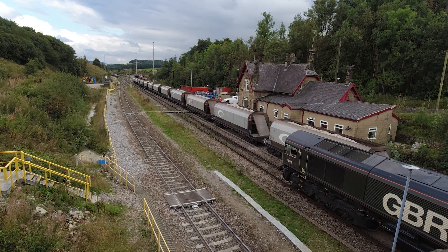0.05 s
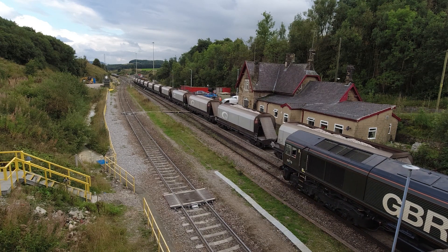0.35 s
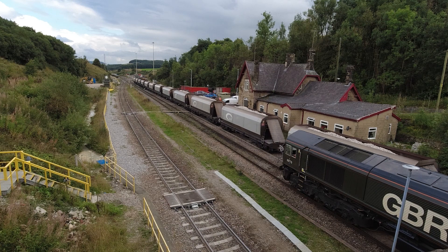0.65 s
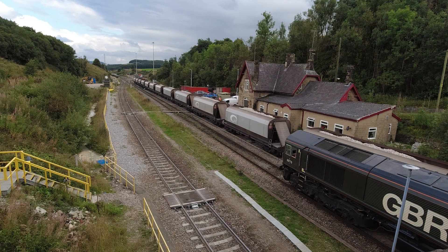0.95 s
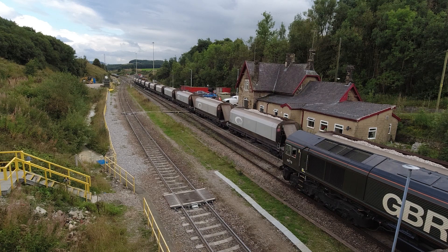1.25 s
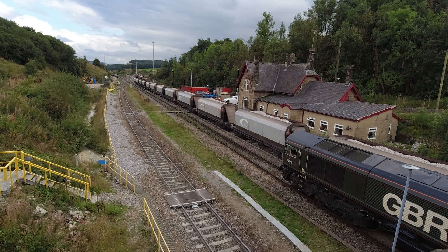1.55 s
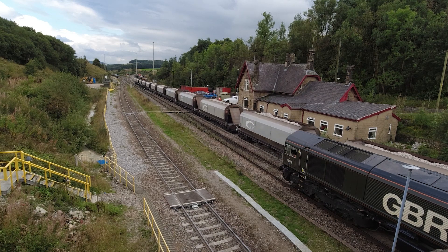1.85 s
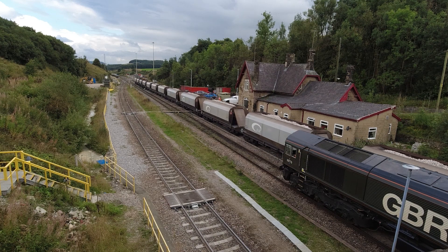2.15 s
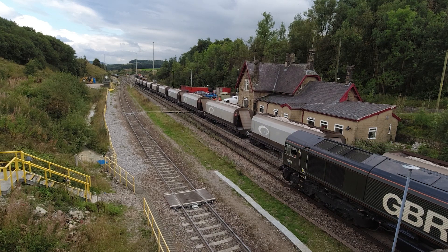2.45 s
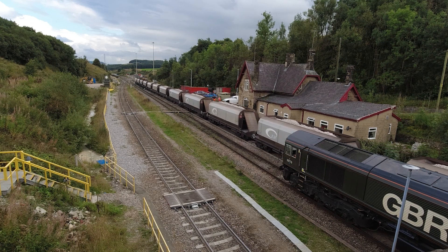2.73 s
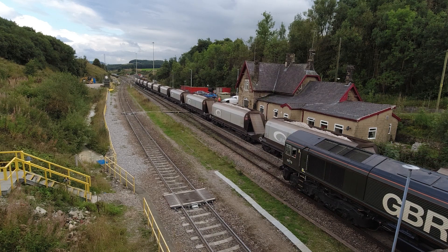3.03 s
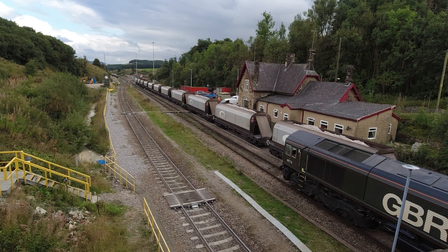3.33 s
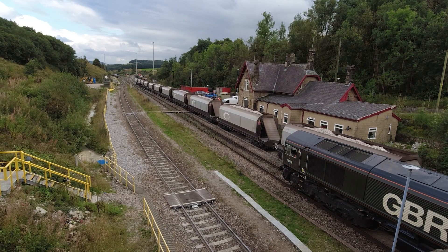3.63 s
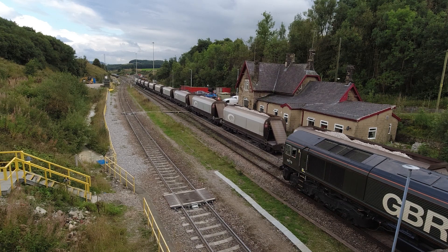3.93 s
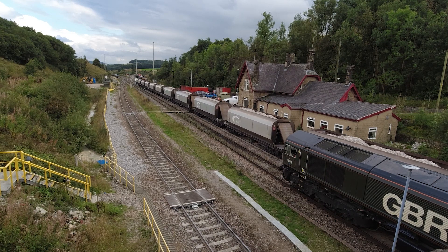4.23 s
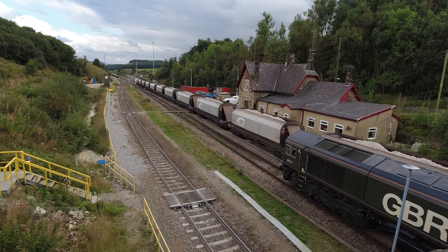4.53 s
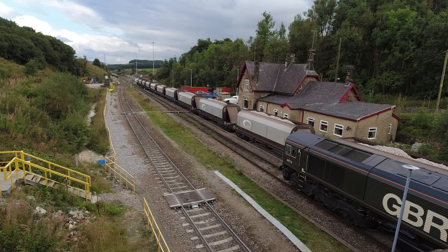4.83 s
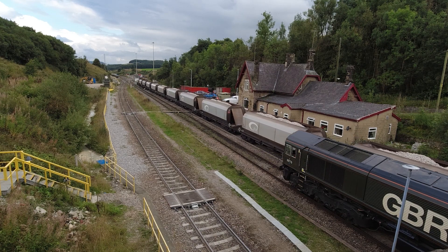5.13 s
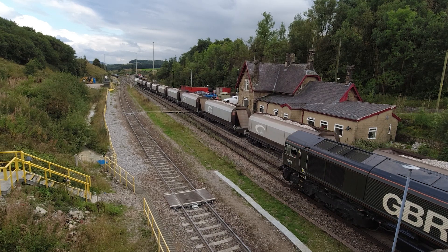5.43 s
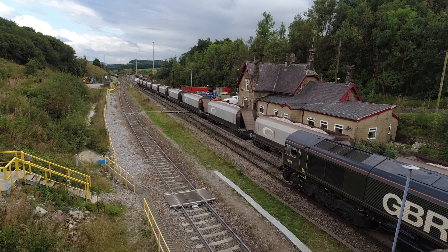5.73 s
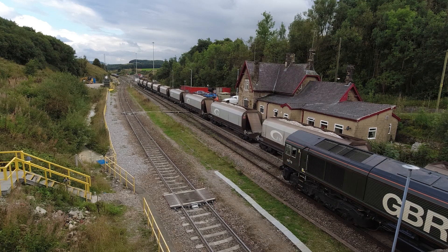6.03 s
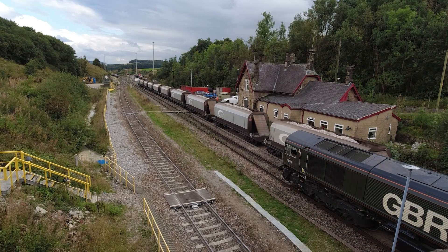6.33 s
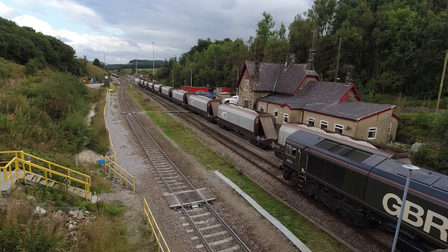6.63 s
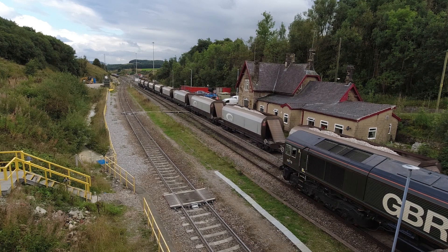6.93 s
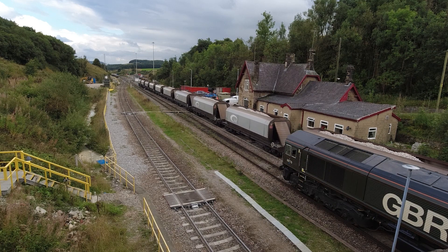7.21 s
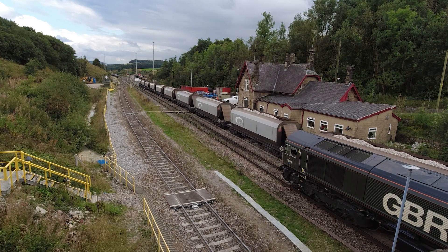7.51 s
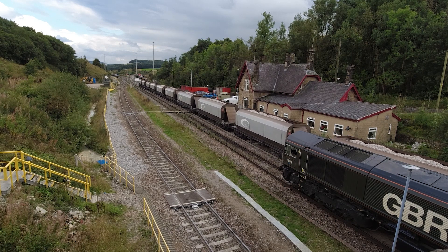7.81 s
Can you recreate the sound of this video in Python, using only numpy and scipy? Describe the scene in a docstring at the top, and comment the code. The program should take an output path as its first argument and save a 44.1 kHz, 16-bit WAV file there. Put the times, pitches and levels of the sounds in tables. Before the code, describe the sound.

Heard from a bridge over a rural railway, a diesel locomotive runs at a steady idle, droning and clattering under rushing fans, wavering high whines and a clinking pump. About a second in comes a short whistling hiss of brake air with a squeal. The exhaust booms softly a few times, a weaker puff of air escapes past the middle, and a brief low hum swells near the end.

```python
"""A twelve-cylinder two-stroke diesel locomotive idles at a country station, heard from a bridge above.
Crank orders hum; the exhaust beats and the machinery clatters once per revolution. Auxiliaries whine
over the fan roar and a pump clinks at its own rate. Brake air escapes in short hisses, whistling at the
valve edges; a squeal and a faint thin tone near 15 kHz sound during the first hiss.
Light knocks, two metal ticks, low rumbles and a brief hum come and go."""
import sys
import numpy as np
from scipy import signal
from scipy.fft import rfft, irfft, next_fast_len
from scipy.io import wavfile
from scipy.ndimage import uniform_filter1d

SR = 44100
rng = np.random.default_rng(int(sys.argv[2]) if len(sys.argv) > 2 else 0)


def dump_mix(stems):
    """Bounce the given channels to the path in sys.argv[1] as a 16-bit WAV at rate SR."""
    frames = np.atleast_2d(stems).T  # one column per channel
    limited = np.clip(frames, -1, 1)  # hard clip at full scale
    pcm = np.round(limited * 32767).astype(np.int16)
    wavfile.write(sys.argv[1], SR, pcm)


N = 347067
TIME = np.arange(N) / SR
CRANK_HZ = 5.72


def gain_of(db):
    """dB to amplitude."""
    return 10 ** (np.asarray(db) / 20)


def unit_rms(x):
    """Scale to rms 1."""
    return x / np.sqrt(np.mean(abs(x) ** 2) + 1e-30)


def log_interp(points, hz):
    """Interpolate (frequency, value) rows on a log-frequency axis."""
    f, value = np.transpose(points)
    return np.interp(np.log(hz + 1), np.log(f + 1), value)


def drift(hz, size=2048):
    """Complex random wander, rms about 1, low-passed at hz."""
    f = np.fft.fftfreq(size, N / SR / size)
    spectrum = np.exp(2j * np.pi * rng.random(size)) / np.sqrt(1 + (f / hz) ** 4)
    return np.interp(TIME, np.linspace(0, N / SR, size), unit_rms(np.fft.ifft(spectrum)))


def stereo_field(hz):
    """Left/right coherence and the left channel's phase factor."""
    # (frequency [Hz], coherence [0-1], left lag [rad])
    field = [(25, 0.3, .02), (93, 0.95, 0.064), (289, 0.99, 0.11), (493, 0.88, 0.19), (690, 1, 0.66),
             (955, 0.81, 0.17), (1830, 0.87, 1.1), (2370, 0, 0.72), (2940, 1, 2.06), (3570, 0.85, 2.32),
             (4410, 0.5, 2.87), (6600, 0.57, 3.7), (7650, 0.76, 6.1), (14000, 0.1, 8.2)]
    f, coherence, lag_rad = np.transpose(field)
    left_phase = np.exp(-1j * log_interp(np.c_[f, lag_rad], hz))
    return np.clip(log_interp(np.c_[f, coherence], hz), 0, 1), left_phase


def from_right(x):
    """Mono to stereo: sound from the right reaches the left later."""
    length = next_fast_len(N + 512, True)
    _, left_phase = stereo_field(np.fft.rfftfreq(length, 1 / SR))
    return np.array([irfft(rfft(x, length) * left_phase, length)[:N], x])


def noise(density, size=N):
    """Partly coherent stereo noise; density(hz) is amplitude per root Hz."""
    length = next_fast_len(size, True)
    hz = np.fft.rfftfreq(length, 1 / SR)
    a, b, c, d = rng.standard_normal((len(hz), 4)).T
    coherence, left_phase = stereo_field(hz)
    right = a + 1j * b
    left = (coherence * right + np.sqrt(1 - coherence ** 2) * (c + 1j * d)) * left_phase
    return irfft(np.array([left, right]) * density(hz), length)[:, :size] * np.sqrt(length * SR) / 2


def resonance(f, hz, width_hz):
    """Steep-sided peak of unit power."""
    half_hz = .8 * width_hz
    return np.sqrt(2 / (np.pi * half_hz)) / (1 + ((f - hz) / half_hz) ** 2)


def swell(t, rise_s, fall_db_s):
    """Gaussian rise to t = 0, then exponential decay."""
    return np.exp(-(np.minimum(t, 0) / rise_s) ** 2 / 2) * gain_of(-fall_db_s * np.maximum(t, 0))


def held(top_s, hold_s, rise_s, fall_db_s):
    """Swell that stays at its top for hold_s."""
    t = TIME - top_s
    return swell(t - np.clip(t, 0, hold_s), rise_s, fall_db_s)


def bursts(rows, size=65536):
    """One swell of resonant noise per row."""
    out = np.zeros((2, N))
    for peak_s, hz, width_hz, db, rise_s, fall_db_s in rows:
        start = max(round(peak_s * SR) - size // 4, 0)
        t = TIME[start:start + size] - peak_s
        band = noise(lambda f: resonance(f, hz, width_hz), size)[:, :len(t)]
        out[:, start:start + size] += gain_of(db) * swell(t, rise_s, fall_db_s) * band
    return out


def flutter(x, depth_db):
    """Random gain in 500 Hz by 30 ms patches, mid and side independent; depth_db is a function of Hz."""
    hz, _, z = signal.stft(np.array([x[0] + x[1], x[0] - x[1]]) / 2, SR, nperseg=256)
    patches = uniform_filter1d(rng.standard_normal(z.shape), size=3, axis=1)
    patches = uniform_filter1d(patches, size=10, axis=2)
    patches = unit_rms(patches - uniform_filter1d(patches, size=70, axis=2))
    mid, side = signal.istft(z * gain_of(depth_db(hz)[:, None] * patches), nperseg=256)[1][:, :N]
    return np.array([mid + side, mid - side])


def crank(wander=.00054):
    """Crankshaft angle in turns; the governor holds the speed almost constant."""
    hunting = drift(hz=2.1).real
    return np.cumsum(CRANK_HZ * (1 + wander * (hunting - hunting.mean()))) / SR


def revolution(turns, order_rms, size=16384):
    """Random-phase cycle of orders 1, 2, ..., repeated every turn."""
    spectrum = np.r_[0, order_rms * np.exp(2j * np.pi * rng.random(len(order_rms)))]
    cycle = irfft(spectrum, size) * size / np.sqrt(2)
    return np.interp(turns % 1, np.arange(size) / size, cycle, period=1)


def exhaust(turns, sixth_db=-46.5, ninth_db=-42, boom_rest_db=-41, sway_db=.2, limp_rad=.45):
    """Orders 6 and 9 drone; order 15 booms in swells and limps with the uneven firings."""
    # (top [s], hold [s], level [dB])
    booms = [(1.84, .07, -41), (2.43, .02, -34), (2.57, .03, -34.5), (2.7, .16, -38), (2.95, .04, -33.5),
             (3.13, .02, -39), (4.18, .08, -42.5), (4.68, .12, -44.5), (5.51, .12, -37.5),
             (5.94, .2, -36.7)]
    sixth, ninth = [gain_of(db - sway_db * unit_rms(drift(hz=.88).real)) for db in (sixth_db, ninth_db)]
    surges = sum(gain_of(db) * held(s, hold_s, rise_s=.021, fall_db_s=204) for s, hold_s, db in booms)
    tone = lambda order: np.sqrt(2) * np.exp(2j * np.pi * (order * turns + rng.random()))
    drone = sixth * tone(6) + ninth * tone(9)
    shudder = 1 + .078 * drift(hz=10)
    limp = np.exp(1j * limp_rad * np.sin(2 * np.pi * turns))
    boom = (gain_of(boom_rest_db) + surges) * shudder * limp * tone(15)
    return from_right((drone + boom).real)


def chuff(turns, order=39, peak_turn=.34, level_db=-45, uneven_db=1.2):
    """One heavy beat of varying force per turn rings the exhaust; the tails overlap."""
    since_s = ((turns - peak_turn + .25) % 1 - .25) / CRANK_HZ
    ring = np.sqrt(2) * np.exp(2j * np.pi * order * turns) * (1 + .35 * drift(hz=20))
    beats = sum(swell(since_s + k / CRANK_HZ, rise_s=.014, fall_db_s=230) for k in (-1, 0, 1, 2))
    force = gain_of(level_db + uneven_db * unit_rms(drift(CRANK_HZ).real))
    return from_right(force * beats * ring.real)


def machinery(turns, uneven_db=2, shimmer=.26):
    """Valve and injector clatter repeats every turn, pushed by the twelve firings."""
    # (crank order, level [dB])
    strong_orders = [(7, -57.5), (8, -60), (11, -56.5), (12, -58), (17, -58), (18, -57.5), (21, -62),
                     (24, -57), (27, -53.5), (32, -60.5), (36, -62), (47, -61.5), (48, -59), (63, -60),
                     (66, -58), (69, -62), (71, -62), (74, -58), (77, -60), (79, -57), (81, -51), (82, -58),
                     (83, -60), (84, -60.5), (87, -56), (92, -61), (96, -58), (99, -59.5), (101, -59),
                     (104, -58.5), (110, -61.5), (111, -60), (112, -58), (113, -54), (114, -59),
                     (116, -60.5), (117, -62), (120, -62), (123, -65), (126, -63), (134, -65.5), (135, -64),
                     (141, -64.5), (142, -65), (144, -64), (149, -66.5), (151, -65), (153, -67), (156, -64),
                     (158, -64.5), (160, -69), (173, -70), (176, -69.5), (226, -70.5), (227, -71.5),
                     (236, -68.5), (238, -68.5), (246, -70)]
    # other orders: (frequency [Hz], level per order [dB])
    clatter_spectrum = [(25, -58), (130, -70), (230, -60.5), (320, -78.5), (450, -61.5), (620, -61),
                        (740, -70), (880, -74), (1150, -82), (1400, -78), (1900, -81), (2400, -91.5)]
    orders = np.arange(1, 520)
    clatter = gain_of(log_interp(clatter_spectrum, orders * CRANK_HZ))
    clatter *= unit_rms(gain_of(uneven_db * rng.standard_normal(len(orders))))
    strong = np.zeros(len(orders))
    for order, db in strong_orders:
        strong[order - 1] = gain_of(db)
    exhaust_range = (orders <= 6) | np.isin(orders, [9, 14, 15, 16])
    clatter[exhaust_range | (strong > 0)] = 0
    angle = 2 * np.pi * turns
    # unequal cylinders lope once and twice per turn
    firing = unit_rms(1 + .08 * np.cos(12 * angle) - .1 * np.cos(angle) + .05 * np.sin(2 * angle))
    direct = revolution(turns, clatter) * firing + revolution(turns, strong)
    # wavering reflections off the cutting, from the opposite side
    reflected = sum(shimmer * drift(hz=1).real * revolution(turns, clatter + strong) for _ in range(3))
    return from_right(direct) + from_right(reflected)[::-1]


def churn(x, depth_db=1.13, centre_hz=620, spread_hz=330):
    """The midrange surges in random clumps of about 1/6 s."""
    hz, _, z = signal.stft(x, SR, nperseg=1024)
    clumps = uniform_filter1d(rng.standard_normal(z.shape[1:]), size=7, axis=0)
    clumps = unit_rms(uniform_filter1d(clumps, size=14, axis=1))
    band_db = depth_db / (1 + ((hz[:, None] - centre_hz) / spread_hz) ** 4)
    return signal.istft(z * gain_of(band_db * clumps), nperseg=1024)[1][:, :N]


def roar(turns, fizz_hz=1500, hiss_hz=5600, flutter_db=4, dulling_db_s=.04, sway_db=1.2):
    """Fan and exhaust flow noise; below a steady hiss it throbs in a pattern repeating every turn."""
    # (frequency [Hz], density [dB/Hz])
    flow_spectrum = [(12, -64), (40, -66.5), (90, -62.5), (170, -66.5), (300, -70.5), (480, -73.5),
                     (700, -76.5), (880, -76), (1150, -81), (2200, -86), (3050, -89), (3400, -90.5),
                     (3900, -92), (4300, -95.5), (4800, -98.5), (6000, -109.0), (6800, -120.9),
                     (9000, -115.3), (13000, -120.7), (15000, -137.7)]
    below = lambda f, hz: 1 / (1 + (f / hz) ** 8)

    def band(share):
        return noise(lambda f: gain_of(log_interp(flow_spectrum, f)) * np.sqrt(np.maximum(share(f), 0)))

    body = band(lambda f: below(f, fizz_hz))
    fizz = band(lambda f: below(f, hiss_hz) - below(f, fizz_hz))
    hiss = band(lambda f: 1 - below(f, hiss_hz))
    throb_orders = np.isin(np.arange(1, 17), [8, 11, 14, 15])
    throb = unit_rms(1 + .11 * unit_rms(revolution(turns, throb_orders)))
    # a random patchy flutter is laid over 3-5 kHz
    fizz = flutter(fizz, lambda f: flutter_db / (1 + ((f - 4200) / 1250) ** 4))
    fizz *= gain_of(-dulling_db_s * (TIME - TIME.mean()))
    return (body + fizz) * throb * gain_of(sway_db * drift(hz=1).real) + hiss


def whines(turns, lift_db=1.8, wander_hz=2, scatter=.3, throb_db=1.1, peak_turn=.33):
    """Three auxiliaries whine, blurred by reflections, over singing gears and pipes; all throb per turn."""
    # name: (frequency [Hz], width [Hz], fuzz share [0-1], left lag [rad])
    tones = {"thin": (1807, 6, .1, 1.1), "middle": (2010, 9, .07, 1.3), "high": (3049.8, 10, .04, 2.3)}
    # name: (time [s], level before lift [dB])
    levels = {"thin": [(0, -72), (4.2, -72), (4.32, -61), (5.03, -61), (5.12, -70), (7.87, -73)],
              "middle": [(0, -58), (.36, -65), (.66, -62), (.78, -54), (.88, -63), (1.12, -64),
              (1.65, -57.5), (1.88, -62), (2.5, -60.5), (2.76, -68), (3.0, -60.5), (3.6, -58.5),
              (4.44, -60.5), (4.6, -66), (4.92, -64), (7.87, -68)], "high": [(0, -56), (.77, -56),
              (1.12, -57), (1.28, -62), (1.5, -61), (1.75, -56.5), (2.2, -55.5), (2.42, -65), (2.64, -58.5),
              (3.27, -55.5), (3.33, -63), (3.55, -58), (3.74, -57.5), (3.8, -65), (4.2, -59), (4.36, -64),
              (4.62, -56), (4.86, -61), (5.17, -53), (5.21, -63), (5.52, -57.5), (5.68, -62), (6.44, -60.5),
              (6.76, -66), (6.9, -61), (7.24, -66), (7.44, -62), (7.87, -64)]}
    # (frequency [Hz], width [Hz], level [dB])
    gears_and_pipes = [(1345, 30, -67), (1415, 30, -67), (1439.7, 2, -66.5), (2260, 10, -75),
                       (2680, 5, -66), (2841, 4, -72.5), (2945, 3, -76), (2980, 14, -68), (3085, 40, -69),
                       (3680, 90, -74), (4600, 40, -79), (5020, 30, -83), (5566, 10, -79), (5685, 10, -84),
                       (6029, 8, -86), (6099, 8, -82.5)]
    direct, scattered = np.zeros((2, N)), np.zeros((2, N))
    for name, (hz, width_hz, fuzz, lag_rad) in tones.items():
        level = gain_of(lift_db + np.interp(TIME, *np.transpose(levels[name])))
        cycles = np.cumsum(hz + wander_hz * drift(hz=2.25).real) / SR
        tone = level * np.sqrt(2) * np.exp(2j * np.pi * cycles)
        blur = np.sqrt(1 - fuzz) + np.sqrt(fuzz) * drift(width_hz)
        direct += (tone * blur * np.exp([[-1j * lag_rad], [0]])).real
        scattered += (tone * np.array([drift(width_hz), drift(width_hz)])).real
    singing = noise(lambda f: np.sqrt(sum((gain_of(db) * resonance(f, hz, width_hz)) ** 2
                                          for hz, width_hz, db in gears_and_pipes)))
    throb = gain_of(throb_db * np.cos(2 * np.pi * (turns - peak_turn)))
    return (direct + scatter * scattered + singing) * throb


def pump(stroke_hz=7.791, ring_hz=1353, level_db=-54.2, uneven_db=1):
    """Each stroke strikes the same metal ring, which decays under the next."""
    # harder and softer spells: (top [s], hold [s], lift [dB])
    spells = [(.75, .25, -4), (1.16, .26, 4.5), (1.29, 0, 2.5), (1.68, .25, 3), (2.83, 0, 3), (3.1, .3, -4),
              (3.72, .26, 2.5), (4.24, 0, 3), (4.24, .26, 4), (5.01, .64, 3), (5.52, 0, 4), (6.17, 0, 3.5),
              (6.65, .25, -2), (7.19, 0, 3), (7.57, 0, 6)]
    since_s = ((stroke_hz * TIME - .02) % 1 + np.arange(-1, 3)[:, None]) / stroke_hz
    clinks = swell(since_s, rise_s=.011, fall_db_s=150) * np.exp(2j * np.pi * ring_hz * since_s)
    ring = np.sqrt(2) * clinks.sum(0)
    lift_db = sum(db * held(s, hold_s, rise_s=.04, fall_db_s=170) for s, hold_s, db in spells)
    force = gain_of(level_db + lift_db + uneven_db * unit_rms(drift(stroke_hz).real))
    roughness = 1 + .3 * drift(hz=25)
    return from_right(force * (ring * roughness).real)


def knocks(width_hz=260, rise_s=.008, fall_db_s=320):
    """Short bright knocks in the clatter, from straight ahead."""
    # (peak [s], frequency [Hz], level [dB])
    hits = [(0.134, 4390, -69), (1.139, 3960, -64.2), (1.196, 4050, -68), (1.728, 3360, -61.1),
            (2.242, 4050, -66), (2.56, 3620, -62.3), (2.627, 3960, -64), (2.823, 3650, -63.6),
            (3.026, 5000, -70.3), (4.078, 3620, -62.3), (4.078, 4050, -64.2), (4.522, 3620, -64),
            (5.126, 3960, -63), (5.142, 4390, -67.3), (5.251, 3620, -63), (6.294, 3620, -63.5),
            (6.957, 3530, -62), (7.174, 3620, -65)]
    return bursts([(s, hz, width_hz, db, rise_s, fall_db_s) for s, hz, db in hits], size=8192)[0]


def brake_air(sputter_db=1, grain_db=2):
    """Escaping air hisses in grainy puffs, with narrow high tones on top."""
    # (peak [s], level [dB], rise [s], fall [dB/s])
    puffs = [(.69, -102, 0.023, 55), (.81, -101, 0.063, 49), (5.54, -120, 0.14, 60)]
    # (frequency [Hz], relative level [dB])
    air_spectrum = [(3000, -7), (4200, 12), (5600, 7), (6400, 2.5), (7100, -23), (8000, -2), (9600, -1),
                    (10800, -1), (11700, 5), (12400, 3), (13800, 3), (14600, -3), (15500, -5)]
    # valve-edge whistles below 14 kHz; also a faint thin tone near 15 kHz during the first hiss
    # (peak [s], frequency [Hz], width [Hz], level [dB], rise [s], fall [dB/s])
    high_tones = [(.71, 5680, 60, -58.5, 0.025, 80), (.73, 5080, 120, -61, .035, 100),
                  (.78, 4500, 45, -55, .045, 90), (.665, 11400, 80, -63, 0.022, 55),
                  (.67, 11960, 50, -68, 0.025, 40), (.86, 10120, 80, -57, 0.06, 65),
                  (.8, 9060, 60, -64.5, .035, 70), (.85, 9690, 70, -64.5, .06, 55),
                  (.79, 8450, 60, -76, .04, 60), (.76, 12800, 50, -73, .05, 50),
                  (.8, 13600, 70, -71, .05, 45), (.78, 15100, 150, -73, .05, 50),
                  (1.205, 13150, 70, -73, .008, 157), (3.57, 6100, 25, -70, 0.043, 80),
                  (5.05, 11600, 160, -73, 0.043, 150), (5.5, 5900, 480, -65.5, .08, 56),
                  (5.50, 11930, 160, -67.5, 0.054, 55), (5.55, 12350, 300, -75, .07, 80),
                  (6.72, 13600, 400, -81, .08, 33)]
    flow = np.sqrt(sum((gain_of(db) * swell(TIME - s, rise_s, fall_db_s)) ** 2
                       for s, db, rise_s, fall_db_s in puffs))
    air = noise(lambda f: gain_of(log_interp(air_spectrum, f)))
    hiss = flow * flutter(air, lambda f: np.full(len(f), grain_db))
    return (hiss + bursts(high_tones)) * gain_of(sputter_db * drift(hz=16).real)


def brake_squeal(hz=4565, level_db=-49.3, echo_db=-5, width_hz=40):
    """One note rings through the first air release, blurred by diffuse echoes."""
    tone = np.sqrt(2) * np.exp(2j * np.pi * hz * TIME)
    echoes = (tone * np.array([drift(width_hz), drift(width_hz)])).real
    envelope = gain_of(level_db) * held(top_s=.78, hold_s=.07, rise_s=.05, fall_db_s=80)
    return envelope * unit_rms(from_right(tone.real) + gain_of(echo_db) * echoes)


def metal_ticks():
    """A small metal scuff, later a sharp tick."""
    # (peak [s], frequency [Hz], width [Hz], level [dB], rise [s], fall [dB/s])
    ticks = [(1.895, 2450, 447, -48.5, 0.013, 168), (7.135, 7800, 1000, -67.5, .002, 702)]
    return bursts(ticks)


def rumbles():
    """Soft swells of low noise."""
    # (peak [s], frequency [Hz], width [Hz], level [dB], rise [s], fall [dB/s])
    low_swells = [(2.48, 107, 18, -40, 0.076, 44), (2.49, 550, 100, -43, 0.034, 101),
                  (2.95, 93, 14, -45, 0.054, 52), (3.93, 124, 61, -38.5, 0.065, 56),
                  (6.38, 131, 68, -37.5, 0.097, 33)]
    return bursts(low_swells)


def hollow_hum(peak_s=6.77, hz=185, level_db=-40.5):
    """A low note swells once."""
    envelope = gain_of(level_db) * swell(TIME - peak_s, rise_s=.07, fall_db_s=70)
    return from_right(envelope * np.sqrt(2) * np.sin(2 * np.pi * hz * TIME))


def scene():
    """Five layers locked to one crankshaft, plus the independently timed sounds."""
    turns = crank()
    engine = exhaust(turns) + chuff(turns) + churn(machinery(turns)) + roar(turns) + whines(turns)
    return engine + pump() + knocks() + brake_air() + brake_squeal() + metal_ticks() + rumbles() + hollow_hum()


def record(dry):
    """Low-pass at 15.6 kHz."""
    lowpass = signal.firwin(511, 15600, window=("kaiser", 9), fs=SR)
    return signal.oaconvolve(dry, lowpass[None], "same")


dry = scene()
out = record(dry)
dump_mix(out)
```